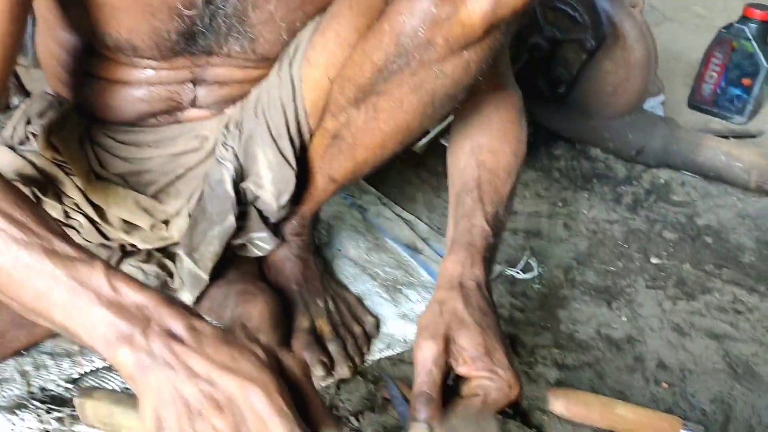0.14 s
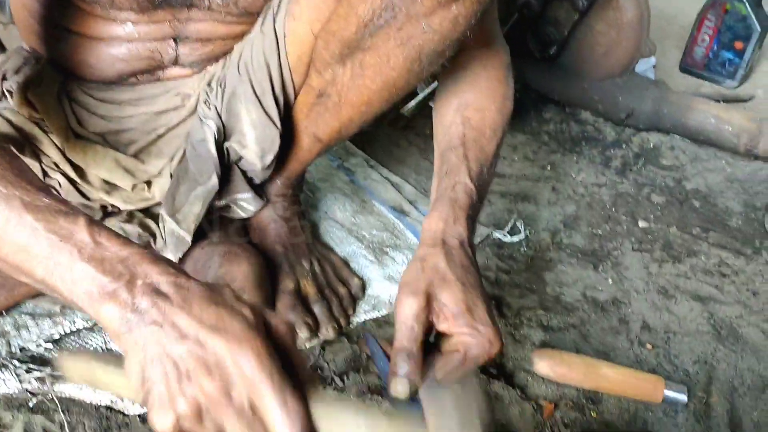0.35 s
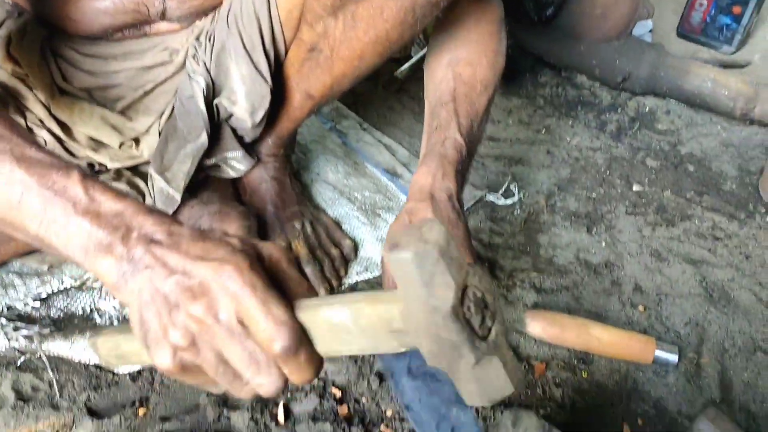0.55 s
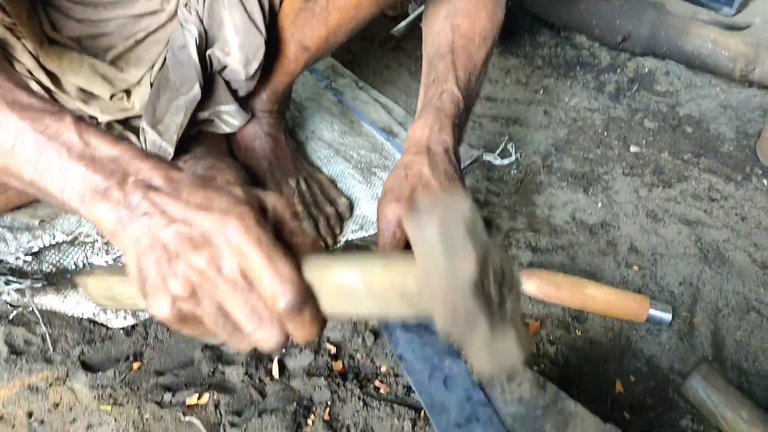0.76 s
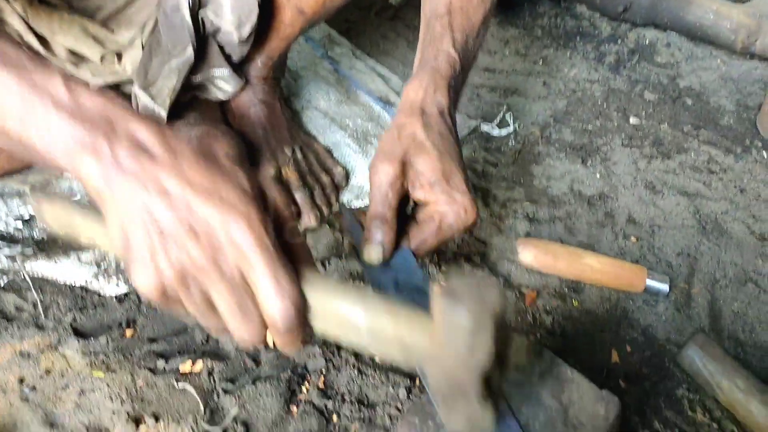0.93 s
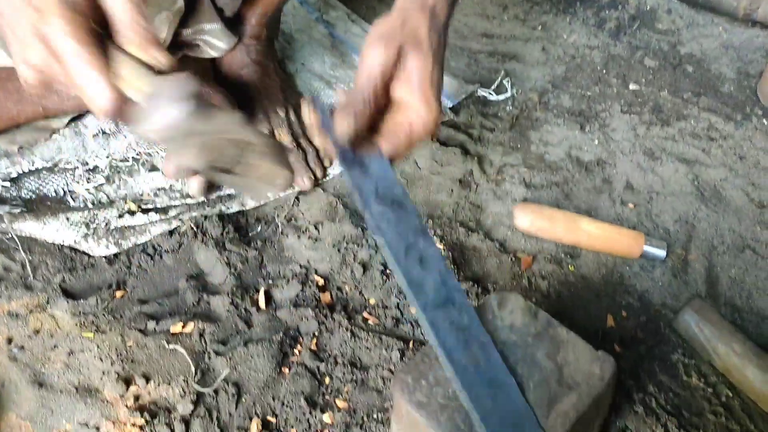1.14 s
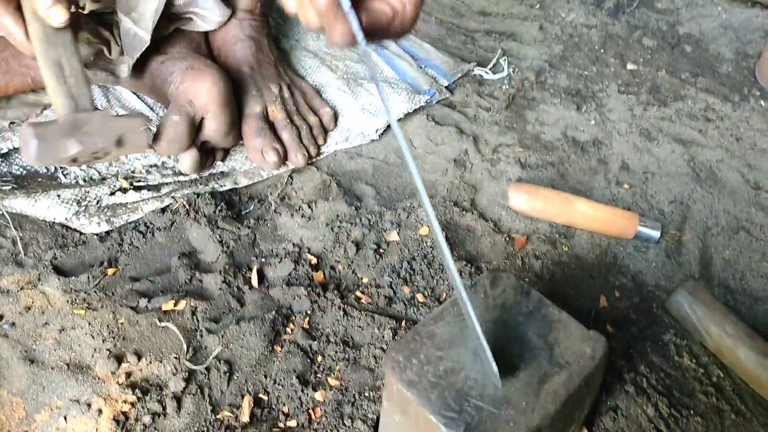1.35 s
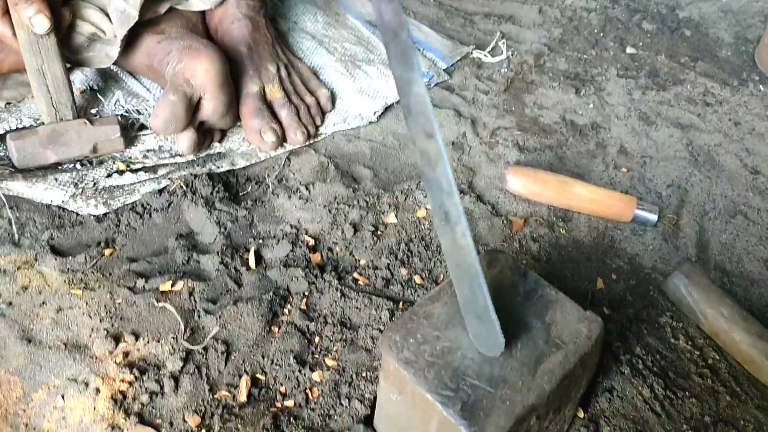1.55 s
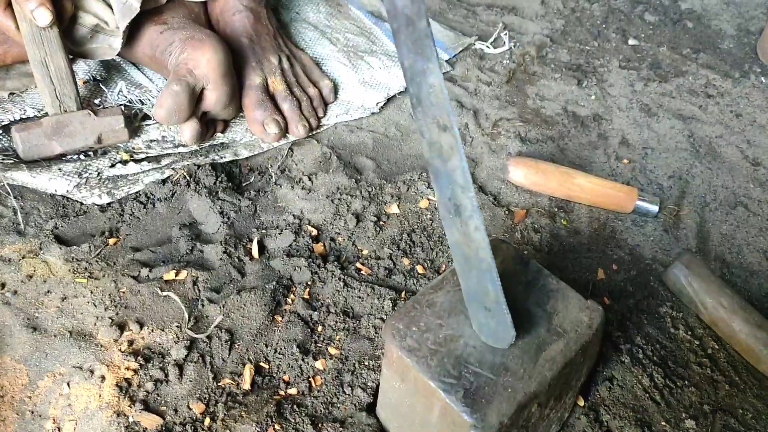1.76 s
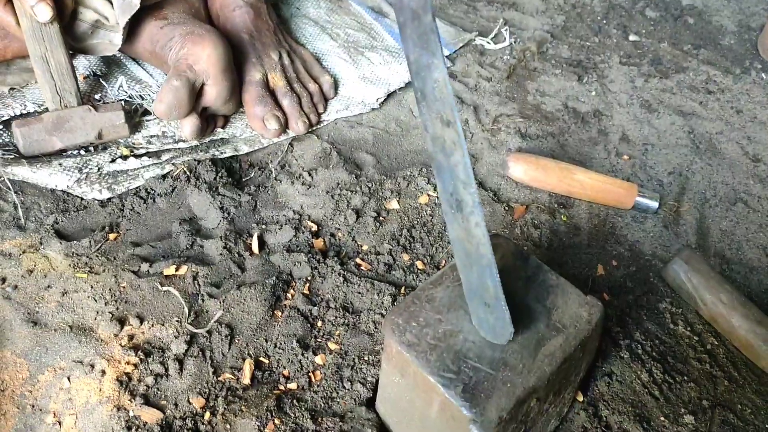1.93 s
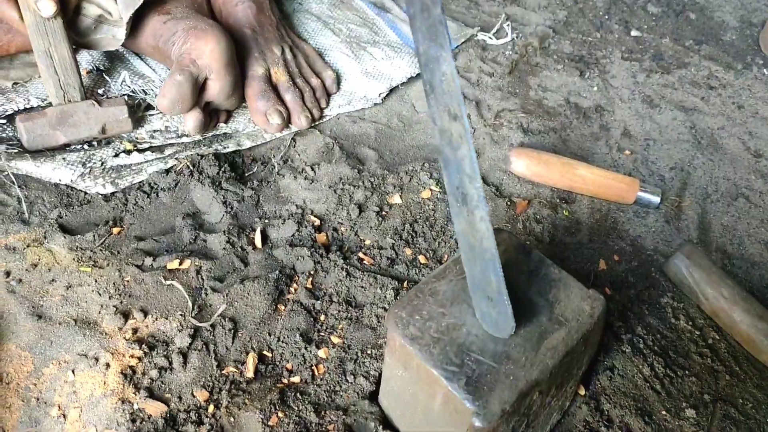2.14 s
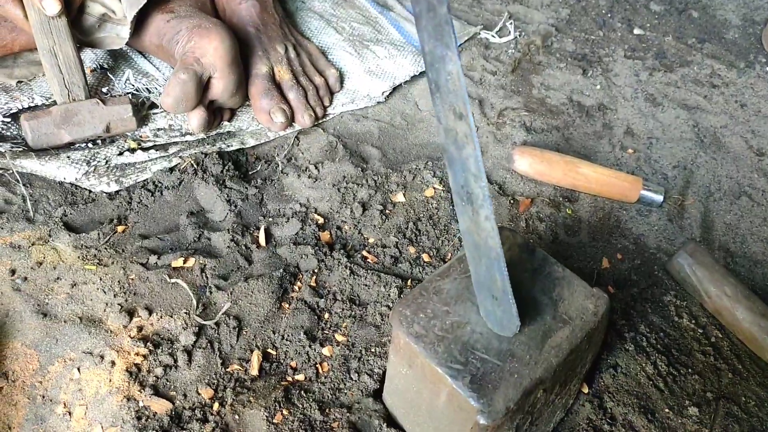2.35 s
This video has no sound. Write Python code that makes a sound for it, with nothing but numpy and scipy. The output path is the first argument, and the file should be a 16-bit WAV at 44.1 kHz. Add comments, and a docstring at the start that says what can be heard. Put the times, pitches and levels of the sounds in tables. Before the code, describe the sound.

Loud, dry metal blows with a deep thud and short bright ring, very close and distorted, end after one second; then faint scrapes, soft humming rumble and a distant rising whine in an earthen-floored workshop.

```python
"""Hammer blows on a steel bar

A hand hammer strikes a steel bar on a small block anvil, close to a phone whose input clips at the blows.
Each blow sums a soft low pulse around its onset, decaying noise and modes (thud, block), band-decaying noise
(clatter) and steel modes (ring). Behind it lie shaped noises (a low rumble with a wavering hum, a thin hiss),
a few faint scrapes of swelling noise as the bar is lifted, and a faint rising tone of two unsteady sines.
"""
import sys
import numpy as np
from scipy import signal
from scipy.fft import rfft, irfft, next_fast_len
from scipy.io import wavfile
from scipy.ndimage import uniform_filter1d

SR = 44100
rng = np.random.default_rng(int(sys.argv[2]) if len(sys.argv) > 2 else 0)


def waveform_to_disk(signal):
    """Save audio, clipped to [-1, 1], as 16-bit WAV at the path in sys.argv[1]."""
    frames = np.transpose(np.atleast_2d(signal))
    scaled = np.clip(frames, -1, 1) * 32767
    samples = np.round(scaled).astype(np.int16)
    wavfile.write(sys.argv[1], SR, samples)


N = 105840  # samples

# The blows; the first falls before the start, the last two are rebounds. Each row: start in seconds,
# thud, clatter and ring levels in dB, thud T60 in seconds, block level in dB, extra level of its lowest mode in dB.
BLOWS = [(-.062, 10.5, -8.5, -13, 0.081, 3.5, -1.5), (0.2095, 7.5, -3, -6, 0.068, 7.5, -2),
         (0.4989, 8, -4, -10, .06, 5.5, -1.5), (0.768, 8.5, -6.5, -19.5, 0.048, 6.5, 11.5),
         (1.026, 10.5, -2.5, -20.5, 0.074, 4.5, 9.5), (1.061, -11.5, -21.5, -19.5, 0.032, -11, 6.5),
         (1.077, -40, -36, -34.5, 0.034, -19, 17)]
# Relative noise spectrum of the thud. Each row: frequency in Hz, density in dB per Hz.
THUD_SPECTRUM = [(24, -31), (40, 6), (177, 4.5), (605, -1), (932, -0.5), (2500, -19.5), (3250, -50.5),
                 (5500, -120)]
# Modes the thud rings with. Each row: frequency in Hz, level in dB, T60 in seconds.
THUD_MODES = [(337.4, -11.5, 0.1), (493.2, -12, 0.04), (577.3, -4, 0.064), (725, -14.5, 0.065),
              (814, -13, 0.049), (923.4, -10.5, 0.04), (1071, -11.5, 0.044)]
# Relative noise spectrum of the clatter. Each row: frequency in Hz, density in dB per Hz.
CLATTER_SPECTRUM = [(300, -5), (650, -13), (1200, -28), (3100, -12.5), (3850, -15), (5200, -10.5),
                    (7070, -6), (8150, -22), (8500, -28.5), (10500, -23.5), (13700, -15.5), (15300, -30),
                    (15600, -61)]
# Decay of the clatter. Each row: frequency in Hz, T60 in seconds.
CLATTER_T60 = [(300, 0.099), (1000, 0.32), (3000, 0.22), (5000, 0.21), (7000, 0.22), (8150, 0.28),
               (8400, .075), (11000, .07), (14000, 0.064)]
# Modes of the steel. Each row: frequency in Hz, level in dB, T60 in seconds.
STEEL_MODES = [(6180, -16.5, .16), (6200, -8.5, 0.2364), (6750, -21, 0.16), (6140, -11, .14),
               (6970, -8.5, 0.12), (6827, -6.5, 0.3), (6850, -10.5, 0.28), (7010, -4, 0.059),
               (7140, -14, 0.088), (7360, -9.5, 0.16), (7308, -4, 0.25), (7360, -18.5, 0.11),
               (7840, 0.5, .15)]
# Low modes of the block on the earth. Each row: frequency in Hz, level in dB, T60 in seconds.
BLOCK_MODES = [(97.54, -25.5, 0.46), (162.2, -18, 0.37)]
# Modes of the bar's free end. Each row: frequency in Hz, level in dB, T60 in seconds.
FREE_END_MODES = [(5200, -15, 0.33), (5350, -12.5, 0.35), (5640, -16, 0.27), (5800, -8, .3),
                  (6360, -7.5, 0.35), (6900, -13, 0.38)]
# Blows that set the free end ringing. Each row: start in seconds, level in dB.
FREE_END_RINGS = [(.769, -22), (1.026, -23), (1.06, -14)]
# Relative spectrum of the rumble. Each row: frequency in Hz, density in dB per Hz.
RUMBLE_SPECTRUM = [(15, -68.5), (25, -20.5), (93, -3), (166, 2), (204, -11), (249, -7), (287, -9),
                   (351, -12), (853, -16.5), (1470, -32.5), (2160, -27), (2590, -33), (3100, -87),
                   (4030, -115), (6820, -120)]
# Course of the rumble. Each row: time in seconds, level in dB.
RUMBLE_LEVEL = [(0, -36), (.6, -35), (1.2, -31), (1.8, -30.5), (2.4, -28.5)]
# Gain of the rumble above 300 Hz and of the hiss. Each row: time in seconds, gain in dB.
TREBLE_GAIN = [(0, -0.5), (.6, -3.5), (1.2, -2.5), (1.7, -1), (2.4, 0.5)]
# Humming bands. Each row: frequency in Hz, width at half amplitude in Hz, level in dB.
HUM_BANDS = [(127.2, 42, -37.5), (161.6, 34, -49), (250.4, 26, -42), (361.8, 36, -48)]
# Likeness of left and right in rumble and hum. Each row: frequency in Hz, correlation (1 is identical).
LIKENESS = [(60, 0.91), (180, 1), (540, 0.54), (1640, -0.19), (4940, 0.17), (14900, 0.19)]
# Relative spectrum of the hiss. Each row: frequency in Hz, density in dB per Hz.
HISS_SPECTRUM = [(1760, -73.5), (3000, -34.5), (3410, -21), (5650, -28.5), (6160, -2.5), (7040, 2.5),
                 (7710, -10), (7840, -18), (8400, -46.5), (10900, -70), (18500, -120)]
# The scrapes; the first two are the bar chattering after a blow.
# Each row: start in seconds, time to the peak in seconds, level in dB, gain below 5500 Hz in dB.
SCRAPES = [(0.799, 0.029, -40, 5), (1.08, 0.035, -42, 4), (1.271, 0.05, -51.5, -9.5),
           (1.348, 0.028, -50.5, -18), (1.594, 0.012, -55, -12), (1.697, 0.0068, -55, -13.5)]
# Relative spectrum of a scrape. Each row: frequency in Hz, density in dB per Hz.
SCRAPE_SPECTRUM = [(1200, -18), (1650, -3), (2300, -9), (2800, -24.5), (4700, -19.5), (5200, -1), (6500, 4),
                   (7400, 12.5), (8100, -2.5), (8500, -51), (9500, -120)]
# Lower line of the faint rising tone far off. Each row: time in seconds, frequency in Hz, level in dB.
WHINE = [(1.2, 624, -62), (1.5, 633, -56.5), (1.899, 666, -51), (2.1, 716, -43.5), (2.4, 789, -54.5)]
# Balance of the two input ports. Each row: frequency in Hz, left over right in dB.
LEFT_OVER_RIGHT = [(200, 0.5), (4000, 0.55), (6000, 0), (7000, 16), (9000, -7), (14000, 13)]

RING_RISE_S, THUD_RISE_S, BLOCK_RISE_S = 0.004, 0.0018, 0.0019  # time constants
SMEAR_S = 0.01  # time constant of the reflections from close surfaces
THUD_HOLD = 1.33  # exponent; over 1 the thud holds, then drops fast
PULSE_DB, PULSE_S, PULSE_PEAK_S = -8, 0.002, -0.00017  # level over the block's, width, peak time from the blow
WANDER_RAD, WANDER_STEP_S = 1.5, 0.01  # random phase of a 7 kHz mode (rms at the knots), knot spacing
FLUTTER_DB_PER_RAD = 2.5  # level flutter per radian of that wander
JAGGED_DB, PATCHY_DB = 3.5, 2.05  # unevenness of clatter over frequency, of rumble over time and frequency
HISS_DB = -61
WHINE_UPPER_RATIO, WHINE_UPPER_DB, WHINE_WAVER_DB = 1.17, -4.5, 5.5  # second line, waver of both
CLIP_AT, CLIP_HARDNESS = 1.0, 11  # ceiling in full scales, exponent of the knee
BASS_CUT_HZ, TOP_HZ = 56.5, 15488


def amp(db):
    """The decibel is logarithmic: 20 dB is a factor of ten in amplitude."""
    return 10 ** (np.asarray(db) / 20)


def unit(x):
    """Mean power fixes level: scale to an rms of 1."""
    return x / np.sqrt(np.mean(x ** 2) + 1e-20)


def along(points, hz):
    """Pitch is logarithmic: interpolate (Hz, value) points on a log axis."""
    f, v = np.transpose(points)[:2]
    return np.interp(np.log(hz + 1), np.log(f + 1), v)


def curve(rows):
    """A slow control is piecewise linear: one value per sample."""
    return np.interp(np.arange(N) / SR, *np.transpose(rows))


def filtered(x, response):
    """Linear filtering multiplies the spectrum by a response of frequency."""
    n = x.shape[-1]
    padded = next_fast_len(n + 8192)
    hz = np.fft.rfftfreq(padded, 1 / SR)
    return irfft(rfft(x, padded) * response(hz), padded)[..., :n]


def noise(spectrum, size):
    """White noise through a filter takes its spectrum: two independent channels, joint rms 1."""
    white = rng.standard_normal((2, size))
    return unit(filtered(white, lambda hz: amp(along(spectrum, hz))))


def add(track, s, sound):
    """Superposition: lay a sound on a track that starts half a second early."""
    at = round((s + .5) * SR)
    track[:, at:at + sound.shape[1]] += sound


def ringing(modes, t, rise):
    """Modal synthesis: damped sines, with random strength, phase and flutter at each blow and port."""
    hz, db, t60 = np.transpose(modes)[:, :, None]
    strength, phase = 2 * rng.standard_normal((2, 2, len(modes), 1))  # dB and radians
    knots = WANDER_RAD * rng.standard_normal((2 * len(modes), 200))
    wander = np.array([np.interp(t / WANDER_STEP_S, np.arange(200), k) for k in knots])
    wander = wander.reshape(2, len(modes), -1)
    # each port's level follows the other port's phase wander
    level = amp(db + strength + FLUTTER_DB_PER_RAD * wander[::-1] - 60 * t / t60)
    wave = np.sin(2 * np.pi * hz * t + phase + wander * np.sqrt(hz / 7000))
    return (level * wave).sum(axis=1) * (1 - np.exp(-t / rise))


def onset_pulse(level_db):
    """A smooth short pulse holds only low frequencies: one soft peak with a trough on each side."""
    u = np.arange(SR // 50) / SR / PULSE_S - 5
    pulse = (1 - u * u / 2) * np.exp(-u * u / 2)
    return amp(level_db) * pulse[None]


def thud(t, level_db, t60):
    """Heavily damped impact: decaying low noise with short modes in it."""
    fade = amp(-60 * (t / t60) ** THUD_HOLD)
    body = fade * noise(THUD_SPECTRUM, len(t))
    return amp(level_db) * (body + ringing(THUD_MODES, t, THUD_RISE_S))


def jagged(pair):
    """Crowded narrow partials differ in strength: random gains at 40 Hz spacing."""
    knots = rng.standard_normal(600)
    return unit(filtered(pair, lambda hz: amp(JAGGED_DB * np.interp(hz / 40, np.arange(600), knots))))


def clatter(t, level_db):
    """Frequency-dependent damping: uneven noise whose bands each die at their own rate."""
    hz, frames, z = signal.stft(jagged(noise(CLATTER_SPECTRUM, len(t))), SR, nperseg=128)
    level = amp(level_db - 60 * frames / along(CLATTER_T60, hz)[:, None])
    return signal.istft(z * level, SR, nperseg=128)[1][:, :len(t)]


def block(t, level_db, lowest_db):
    """Mass on a yielding ground: low modes of the block on the earth."""
    lowest = amp(lowest_db) * ringing(BLOCK_MODES[:1], t, BLOCK_RISE_S)
    return amp(level_db) * (lowest + ringing(BLOCK_MODES[1:], t, BLOCK_RISE_S))


def steel_ring(t, level_db):
    """Lightly damped steel modes, convolved with the dense reflections of close surfaces."""
    near = rng.standard_normal((2, SR // 10)) * np.exp(-t[:SR // 10] / SMEAR_S)
    near /= np.linalg.norm(near[0])
    ring = signal.fftconvolve(ringing(STEEL_MODES, t, RING_RISE_S), near, axes=1)
    return amp(level_db) * ring[:, :len(t)]


def hammer():
    """Impact excitation: each blow sums pulse, thud, clatter, block and ring; some ring the free end too."""
    track, t = np.zeros((2, N + 2 * SR)), np.arange(SR // 2) / SR
    onset = 1 - np.exp(-t / THUD_RISE_S)
    for s, thud_db, clatter_db, ring_db, t60, block_db, lowest_db in BLOWS:
        impact = thud(t, thud_db, t60) + clatter(t, clatter_db) + block(t, block_db, lowest_db)
        add(track, s, onset * impact + steel_ring(t, ring_db))
        # the pulse peaks 5 widths after its own start
        add(track, s - 5 * PULSE_S + PULSE_PEAK_S, onset_pulse(PULSE_DB + block_db))
    for s, db in FREE_END_RINGS:
        add(track, s, amp(db) * ringing(FREE_END_MODES, t, RING_RISE_S))
    return track[:, SR // 2:][:, :N]


def patchy(pair):
    """Non-stationary noise: narrow patches swell and fade at random, alike in both channels."""
    z = signal.stft(pair, nperseg=2048, noverlap=1536)[2]
    field = rng.standard_normal(z.shape[1:])
    field = uniform_filter1d(uniform_filter1d(field, size=3, axis=0), size=9, axis=1)
    return unit(signal.istft(z * amp(PATCHY_DB * unit(field)), nperseg=2048, noverlap=1536)[1][:, :N])


def rumble(gain):
    """Broadband low noise: patchy, with its level and its part above 300 Hz changing in time."""
    sound = patchy(noise(RUMBLE_SPECTRUM, N))
    upper = filtered(sound, lambda hz: 1 / (1 + (300 / (hz + 1)) ** 4))
    return amp(curve(RUMBLE_LEVEL)) * (sound + (gain - 1) * upper)


def hum():
    """Narrow-band noise wavers like an unsteady tone: white noise through resonant peaks."""
    total = np.zeros((2, N))
    for hz, width, db in HUM_BANDS:
        white = rng.standard_normal((2, N))
        total += amp(db) * unit(filtered(white, lambda f: 1 / (1 + ((f - hz) / width * 2) ** 2)))
    return total


def alike(pair):
    """Coherence between ports: mix two noises as mid and side to the correlation wanted."""
    turn = lambda hz: np.arccos(np.clip(along(LIKENESS, hz), -1, 1)) / 2
    mid, side = filtered(pair, lambda hz: np.array([np.cos(turn(hz)), np.sin(turn(hz))]))
    return np.array([mid + side, mid - side])


def hiss(gain):
    """Stationary noise in a narrow treble range, under a slow gain."""
    return amp(HISS_DB) * gain * noise(HISS_SPECTRUM, N)


def background():
    """Incoherent sources add in power: rumble and hum partly shared by the ports, hiss independent."""
    gain = amp(curve(TREBLE_GAIN))
    return alike(rumble(gain) + hum()) + hiss(gain)


def scrapes():
    """Friction noise of the bar on the anvil: a grainy level, a quick swell and a slower fade."""
    track = np.zeros((2, N + 2 * SR))
    for s, peak_s, db, lower_db in SCRAPES:
        u = np.arange(SR // 2) / SR / peak_s
        swell = u * np.exp(1 - u)
        grit = amp(0.5 * unit(uniform_filter1d(rng.standard_normal(len(u)), size=150)))
        tilt = lambda hz: amp(along([(5500, lower_db), (7000, 0)], hz))
        add(track, s, amp(db) * swell * grit * filtered(noise(SCRAPE_SPECTRUM, len(u)), tilt))
    return track[:, SR // 2:][:, :N]


def whine():
    """Phase is the integral of frequency: two lines climb together, unsteady in level and phase."""
    s, hz, db = np.transpose(WHINE)
    t = np.arange(N) / SR
    phase = 2 * np.pi * np.cumsum(np.interp(t, s, hz)) / SR
    # random knots, 25 a second
    waver = [np.interp(t * 25, np.arange(70), k) for k in rng.standard_normal((4, 70))]
    lower = amp(WHINE_WAVER_DB * waver[0]) * np.sin(phase + waver[1])
    upper_level = amp(WHINE_UPPER_DB + WHINE_WAVER_DB * waver[2])
    upper = upper_level * np.sin(WHINE_UPPER_RATIO * phase + waver[3])
    return amp(np.interp(t, s, db, left=-120)) * (lower + upper)


def scene():
    """Superposition of all sources in air."""
    return hammer() + background() + scrapes() + whine()


def clip(x):
    """Saturation: almost linear below the ceiling, with a hard knee."""
    return x / (1 + np.abs(x / CLIP_AT) ** CLIP_HARDNESS) ** (1 / CLIP_HARDNESS)


def record(dry):
    """Port balance is linear, clipping is not; then deep bass and top are cut, and full scale limits."""
    half = np.array([[.5], [-.5]])  # each port takes half of the difference
    x = clip(filtered(dry, lambda hz: amp(along(LEFT_OVER_RIGHT, hz) * half)))
    x = filtered(x, lambda hz: (1j * hz / (BASS_CUT_HZ + 1j * hz)) ** 2)
    top = lambda hz: .065 + .935 / (1 + (hz / TOP_HZ) ** 150)  # a steep step down to .065
    return np.clip(filtered(np.clip(x, -1, 1), top), -1, 1)


dry = scene()
out = record(dry)
waveform_to_disk(out)
```